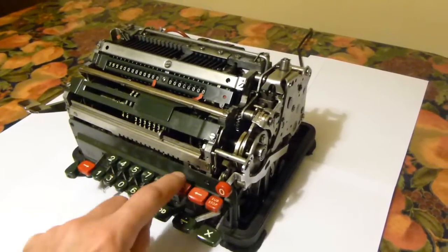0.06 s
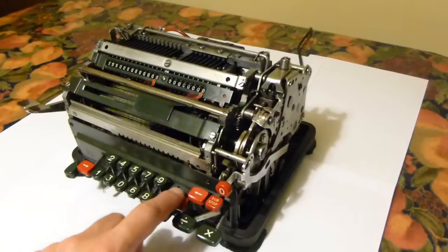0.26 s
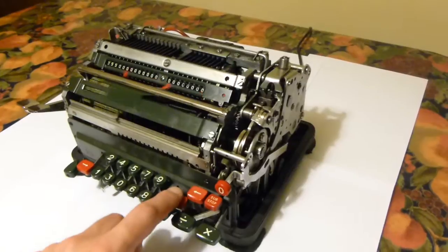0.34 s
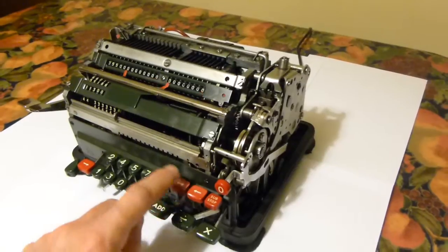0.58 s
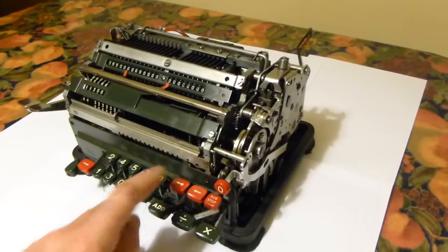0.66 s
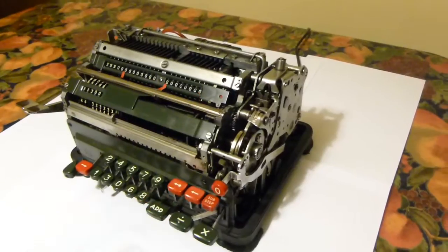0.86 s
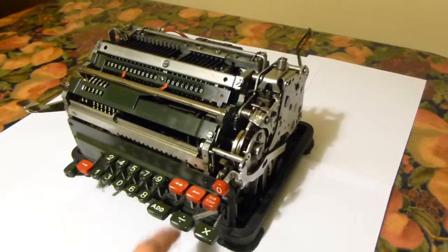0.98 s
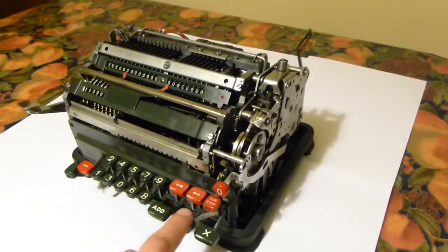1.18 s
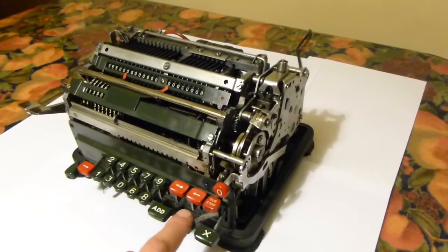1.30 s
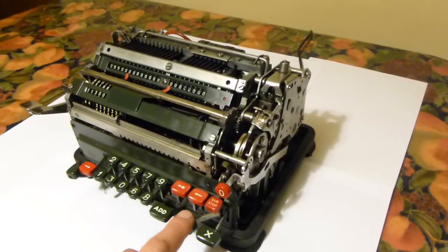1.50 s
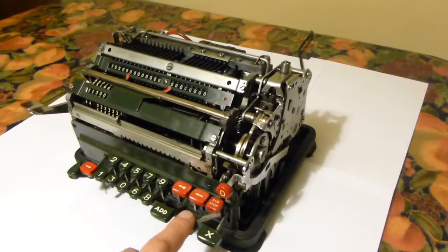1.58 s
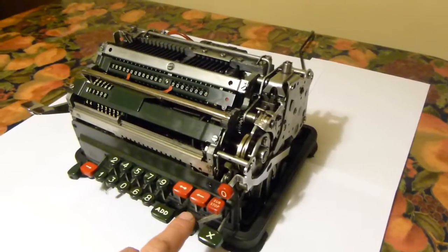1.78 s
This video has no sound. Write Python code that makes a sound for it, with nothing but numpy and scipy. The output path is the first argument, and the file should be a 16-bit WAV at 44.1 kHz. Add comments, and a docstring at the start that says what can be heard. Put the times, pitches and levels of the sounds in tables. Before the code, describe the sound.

A mechanical calculator clatters through one short cycle, followed by a few faint key clicks.

```python
"""An uncovered mechanical calculator on a table in a small room, close to a stereo pair of microphones.
Over quiet room noise a key clicks faintly and trips one working cycle. From 0.2 s gears and pawls
rattle, levers and the carriage strike their stops, the steel rings and the table thumps. A latch snaps,
then the carriage lands with a hollow clack. The mechanism stops near 0.6 s; two soft thuds and a few
faint key clicks follow, and the room noise is left with a faint hum."""
import sys
import numpy as np
from scipy import signal
from scipy.fft import rfft, irfft
from scipy.io import wavfile

SR = 44100
rng = np.random.default_rng(int(sys.argv[2]) if len(sys.argv) > 2 else 0)


def log_audio(samples):
    """Write samples as a 16-bit WAV file to the path given in sys.argv[1]."""
    # one column per channel
    frames = np.atleast_2d(samples).T
    # limit to full scale, then quantise
    limited = np.clip(frames, -1, 1)
    pcm = np.round(limited * 32767).astype(np.int16)
    wavfile.write(sys.argv[1], SR, pcm)


N = 81585

# Room noise. Each row: frequency in Hz, level in dB.
AIR_SPECTRUM = [(30, -8), (70, -6), (110, -1.5), (220, -5), (420, -3), (600, -9), (1130, -10.5),
                (1800, -15), (3400, -21), (4800, -17.5), (12000, -22.5), (15500, -26)]
# How the noise differs between the microphones. Each row: frequency in Hz, side boost in dB.
AIR_WIDTH = [(110, -14.5), (350, -6), (900, 4.5), (4400, -1), (12000, -5)]
# Drift of the room noise. Each row: time in seconds, level in dB.
AIR_DRIFT = [(0, -65.5), (.75, -65.5), (.95, -62.5), (1.3, -64.5), (1.8, -65)]
# Faint tones in the room. Each row: start and end in seconds, pitch in Hz, level in dB.
HUM_TONES = [(0, .2, 428, -76), (1.0, 1.68, 341, -75.5), (.82, 1.28, 210, -77)]
# The room's tail. Each row: frequency in Hz, time to fall 60 dB (t60) in seconds.
ROOM_DECAY = [(120, 0.23), (400, 0.62), (1500, 0.31), (6000, 0.37), (15000, 0.15)]
# Key clicks. Each row: start in seconds, level in dB, build-up and chatter t60 in seconds,
# weight of the mids and of the top treble in dB.
KEY_CLICKS = [(.165, -59, .002, 0.054, -15, -5), (.8580, -51, 0.0018, 0.064, 6, 3),
              (.8700, -55, 0.00089, 0.16, -0.5, 0), (1.033, -59, 0.0036, 0.19, -4.5, 7.5)]
# Tone of a key. Each row: frequency in Hz, level in dB.
KEY_SPECTRUM = [(70, -21.5), (150, -3.5), (500, -8), (870, 0.5), (1100, -3.5), (1400, 1.5), (1900, 3.5),
                (2700, -19.5), (4500, -1), (5500, -7), (6300, -1.5), (7500, -9), (10000, -7), (15500, -19)]
# Gears and pawls through the cycle. Each row: time in seconds, level in dB.
RATTLE_LEVEL = [(.18, -85.5), (.195, -49), (.209, -55.5), (.216, -34), (.255, -28), (.298, -40),
                (.32, -29.5), (.35, -31.5), (.40, -30.5), (.44, -29), (.485, -32.5), (.51, -37),
                (.525, -29.5), (.54, -30.5), (.57, -30.5), (.60, -40), (.65, -101)]
# Tone of the gears and pawls. Each row: frequency in Hz, level in dB.
RATTLE_SPECTRUM = [(80, -33.5), (140, -7.5), (300, -5), (750, -5), (1000, -8), (1130, -2.5), (1800, -6),
                   (4000, -1.5), (4450, -4), (4900, -1.5), (9000, -2), (12000, 0.5), (15500, -1)]
# Steel parts near the microphones. Each row: pitch in Hz, level in dB, t60 in seconds.
PART_MODES = [(2751, -10.5, 0.17), (3490, -7, 0.22), (4054, -8, 0.38), (4695, -5, 0.24), (5890, -4.5, 0.2),
              (7483, -6, .26), (8410, -5.5, 0.22), (9900, -1, .24), (11400, -5, 0.18), (11800, -2, .22)]
# Levers and carriage hitting their stops. Each row reads as for the key clicks.
LEVER_BLOWS = [(.2115, -24, 0.00017, 0.0323, -9.5, 1), (.2345, -21, 0.00066, .025, -3.5, -8.5),
               (.2400, -17, .0006, 0.08, -5, -3.5), (.2500, -27.5, 0.0012, 0.084, 4, -3.5),
               (.2645, -28.5, 0.002, 0.036, 6, -1), (.3037, -11, 0.0002, 0.02, -17, -2),
               (.3060, -13, .0006, 0.031, -6.5, -1), (.3162, -16.5, .001, .022, -9, 1),
               (.3335, -21, 0.0017, 0.078, -7.5, 9), (.3410, -19.5, .002, 0.027, -11, 6),
               (.3675, -16, 0.0042, 0.06, -1, 1.5), (.3718, -9.5, 0.00051, 0.013, 3, -5.5),
               (.3805, -18, .001, 0.055, 0, 0), (.3880, -20, .001, 0.02, -1.5, 4.5),
               (.3975, -18, 0.0017, 0.07, -12, 3), (.4060, -25, .0005, .015, 12, -7.5),
               (.4165, -28.5, .001, 0.12, 0.5, 2), (.4505, -25.5, 0.0023, 0.35, -14.5, 4),
               (.5298, -27, 0.00033, 0.015, 12.5, -7), (.5437, -18.5, .0005, 0.054, 3.5, 5.5),
               (.5480, -20.5, 0.0054, 0.046, -2.5, 4.5)]
# Steel on steel. Each row: frequency in Hz, level in dB.
STEEL_SPECTRUM = [(80, -41), (140, -20.5), (420, -18.5), (580, -13), (820, -4.5), (980, -14), (1250, -7.5),
                  (1750, -7.5), (2150, -10), (2900, -4), (3700, -6.5), (4800, -1.5), (6000, -3.5),
                  (8000, 1.5), (11500, 2), (15500, -4.5)]
# The machine jolting the table. Each row: time in seconds, level in dB.
TABLE_JOLTS = [(0.254, -38.5), (0.314, -39.5), (0.41, -40.5), (.476, -45), (0.552, -37), (0.666, -51.5),
               (0.892, -55.5)]
# The table top. Each row: pitch in Hz, level in dB, t60 in seconds.
TABLE_MODES = [(125, -4.5, 0.13), (137, 2.5, 0.19), (241.7, -5, 0.42)]
# The bright latch and the hollow carriage. Each row: pitch in Hz, level in dB.
LATCH_MODES = [(1320, -7), (1510, -7.5), (4700, -4), (5330, -4), (6300, -4), (7480, 3.5), (8100, -5)]
CARRIAGE_MODES = [(620, -3.5), (800, -5), (1480, 1), (2135, 3.5), (2750, 6), (3230, 4), (4020, -2)]
# A small steel piece with two beating modes. Each row: pitch in Hz, level in dB.
PING_MODES = [(9987, 0), (10016, -7)]
# Blows that jar that piece. Each row: start in seconds, level in dB.
PING_HITS = [(0.309, -27), (0.334, -27.5), (.415, -32), (0.546, -28)]

BASS_HZ, MIDS_HZ, TREBLE_HZ, TOP_TREBLE_HZ, TOP_HZ = 315, 1860, 7000, 12370, 15500
PARTS_DB, PARTS_SIDE_DB = -16.5, -10


def undb(db):
    """Decibels to gain."""
    return 10 ** (np.asarray(db) / 20)


def unit(x):
    """Scale to unit energy."""
    return x / np.sqrt(np.sum(x ** 2))


def seconds():
    """Time axis."""
    return np.arange(N) / SR


def fade(t60, start=0):
    """Hold at 1 until start, then fall 60 dB every t60 seconds."""
    return undb(-60 * np.maximum(seconds() - start, 0) / t60)


def curve(rows):
    """Gain along (s, dB) points."""
    return undb(np.interp(seconds(), *np.array(rows).T))


def at_hz(hz, rows):
    """Read (Hz, value) points on a log-frequency axis."""
    freqs, values = np.array(rows).T
    return np.interp(np.log(np.maximum(hz, 1)), np.log(freqs), values)


def through(x, response):
    """Pass a sound through an impulse response."""
    return signal.fftconvolve(x, response)[:N]


def butter(x, order, hz, kind):
    """Butterworth filter."""
    return signal.sosfilt(signal.butter(order, hz, kind, fs=SR, output="sos"), x)


def colour(*spectra, size=2048):
    """Minimum-phase, unit-energy response of summed (Hz, dB) spectra."""
    db = sum(at_hz(np.fft.rfftfreq(size, 1 / SR), spectrum) for spectrum in spectra)
    cepstrum = irfft(np.log(undb(db)))
    cepstrum[1:size // 2] *= 2
    cepstrum[size // 2 + 1:] = 0
    return unit(irfft(np.exp(rfft(cepstrum))))


def ring(modes, size=24000):
    """Unit-energy response of (Hz, dB, t60) modes."""
    t = seconds()[:size]
    return unit(sum(undb(db - 60 * t / t60) * np.sin(2 * np.pi * hz * t) for hz, db, t60 in modes))


def stereo(mid, side):
    """Left and right from mid and side."""
    return np.array([mid + side, mid - side])


def room_noise(side_db=-0.5):
    """The room's quiet background, different at each microphone."""
    mid = through(rng.standard_normal(N), colour(AIR_SPECTRUM))
    side = through(rng.standard_normal(N), colour(AIR_SPECTRUM, AIR_WIDTH))
    return curve(AIR_DRIFT) * stereo(mid, undb(side_db) * side)


def hum(fade_s=.1, waver_hz=5, waver_depth=.5):
    """Faint tones come and go, wandering in level and phase."""
    out, t = np.zeros(N), seconds()
    for start, end, hz, db in HUM_TONES:
        wander = signal.hilbert(butter(rng.standard_normal(N), 2, waver_hz, "low"))
        tone = ((1 + waver_depth * wander / np.std(wander)) * np.exp(2j * np.pi * hz * t)).real
        gate = np.clip(np.minimum(t - start, end - t) / fade_s + .5, 0, 1)
        out += undb(db) * gate * np.sqrt(N) * unit(tone)
    return out


def room_response(bands=7, size=24000, build_s=0.0029):
    """Diffuse reflections whose top treble dies first."""
    noise, t = rfft(rng.standard_normal(size)), seconds()[:size]
    freqs, centres = np.fft.rfftfreq(size, 1 / SR), np.geomspace(100, TOP_HZ, bands)
    tail = np.zeros(size)
    for hz, share in zip(centres, np.eye(bands)):
        band = irfft(noise * at_hz(freqs, list(zip(centres, share))))
        tail += band * fade(at_hz(hz, ROOM_DECAY))[:size]
    return unit(tail * (1 - np.exp(-t / build_s)))


def room_tail(x, level_db, side_db=-7):
    """What the walls send back to the pair."""
    mid, side = through(x, room_response()), through(x, room_response())
    return undb(level_db) * stereo(mid, undb(side_db) * side)


def room(x, side_db=-10):
    """Direct sound, slightly different at the two microphones, and the room's tail."""
    side = through(x, unit(rng.standard_normal(N) * fade(0.02)))
    return stereo(x, undb(side_db) * side) + room_tail(x, level_db=-8.5)


def strikes(rows, spectrum):
    """Each contact builds up, then chatters away; heavy parts carry more mids, light ones more treble."""
    out = np.zeros(N)
    for start, db, build_s, t60, mids_db, top_db in rows:
        rise = np.exp(np.minimum(seconds() - start, 0) / build_s)
        chatter = rise * fade(t60, start) * rng.standard_normal(N)
        weight = [(BASS_HZ, 0), (MIDS_HZ, mids_db), (TREBLE_HZ, 0), (TOP_TREBLE_HZ, top_db)]
        out += undb(db) * through(chatter, colour(spectrum, weight))
    return out


def key_clicks():
    """Light key contacts, heard in the room before and after the cycle."""
    return room(strikes(KEY_CLICKS, KEY_SPECTRUM))


def gear_rattle(count=400, teeth_per_s=330, jitter=.5, scatter_db=2.5, tick_t60=0.029):
    """Gear teeth and pawls tick in a quick, uneven stream while the mechanism turns."""
    gap, strength = rng.uniform(-0.9, 1, (count, 2)).T
    times = np.cumsum(1 + jitter * gap) / teeth_per_s
    ticks = np.bincount((times * SR).astype(int), undb(scatter_db * strength), N)[:N]
    power = np.abs(through(ticks ** 2, fade(tick_t60) ** 2))
    grain = np.sqrt(power / power[:int(times[-1] * SR)].mean())
    return through(grain * rng.standard_normal(N) * curve(RATTLE_LEVEL), colour(RATTLE_SPECTRUM))


def steelwork(contacts, frame_modes=160, frame_t60=0.14, frame_db=-15.5):
    """Contacts ring the frame's many weak modes into the room, and a few clear parts close to the pair."""
    frame = ring([(hz, 0, frame_t60) for hz in rng.uniform(1200, TOP_HZ, frame_modes)], size=10000)
    side_modes = [(hz, db + 4 * rng.standard_normal(), t60) for hz, db, t60 in PART_MODES]
    side = signal.hilbert(through(contacts, ring(side_modes))).imag  # a quarter cycle off, for width
    parts = stereo(through(contacts, ring(PART_MODES)), undb(PARTS_SIDE_DB) * side)
    return room(contacts + undb(frame_db) * through(contacts, frame)) + undb(PARTS_DB) * parts


def lever_blows(places=3):
    """Levers and carriage hit stops at several places, each with its own path to the microphones."""
    return sum(steelwork(strikes(LEVER_BLOWS[place::places], STEEL_SPECTRUM)) for place in range(places))


def table_thuds(push_s=0.0032, low_cut_hz=108):
    """The machine's weight pushes on the table top, which thuds into the room."""
    wood = butter(ring(TABLE_MODES), 4, low_cut_hz, "high")
    half_s = push_s / 2
    pushes = sum(undb(db) * np.exp(-2 * ((seconds() - at) / half_s) ** 2) for at, db in TABLE_JOLTS)
    thuds = through(pushes / (half_s * SR), wood / np.abs(wood).max())
    return thuds + room_tail(thuds, level_db=-12.5)


def struck(modes, start, level_db, t60):
    """A part's (Hz, dB) modes, struck at one moment, as a complex signal."""
    t = seconds() - start
    tones = sum(undb(db) * np.exp(2j * np.pi * (hz * t + rng.random())) for hz, db in modes)
    return undb(level_db) * (t >= 0) * fade(t60, start) * tones


def latch_snap():
    """The latch snaps with a bright bite."""
    return struck(LATCH_MODES, start=.3045, level_db=-20.5, t60=.045).real


def steel_ping(t60=.24):
    """A small steel piece close by, jarred again and again, keeps up a high, beating ring."""
    hits = sum(struck(PING_MODES, start, db, t60) for start, db in PING_HITS)
    return stereo(hits.real, undb(PARTS_SIDE_DB) * hits.imag)


def carriage_clack():
    """The carriage lands with a dry, hollow clack."""
    return struck(CARRIAGE_MODES, start=.3712, level_db=-20, t60=0.019).real


def scene():
    """The room, the keys and one working cycle as they reach the pair."""
    cycle = lever_blows() + table_thuds() + room(latch_snap() + carriage_clack())
    cycle += steelwork(gear_rattle()) + steel_ping()
    return cycle + key_clicks() + room_noise() + hum()


def record(dry, low_cut_hz=13, ceiling=0.5):
    """The recorder thins the deep bass, rounds the highest peaks and cuts the top."""
    thin = butter(dry, 2, low_cut_hz, "high")
    rounded = ceiling * np.tanh(thin / ceiling)
    return signal.sosfilt(signal.ellip(8, .2, 70, TOP_HZ, fs=SR, output="sos"), rounded)


dry = scene()
out = record(dry)
log_audio(out)
```